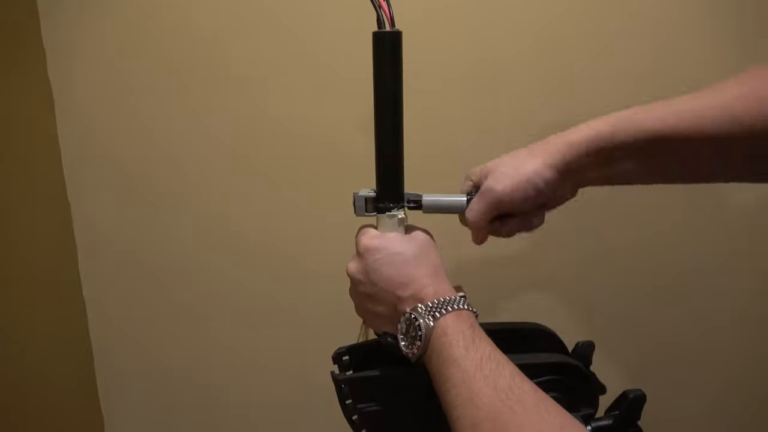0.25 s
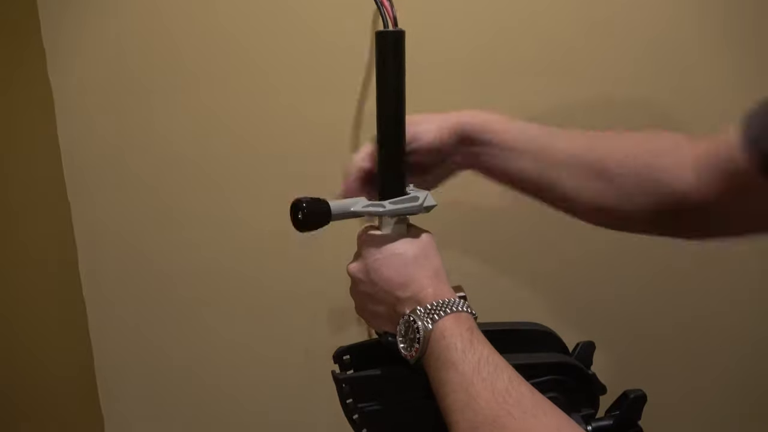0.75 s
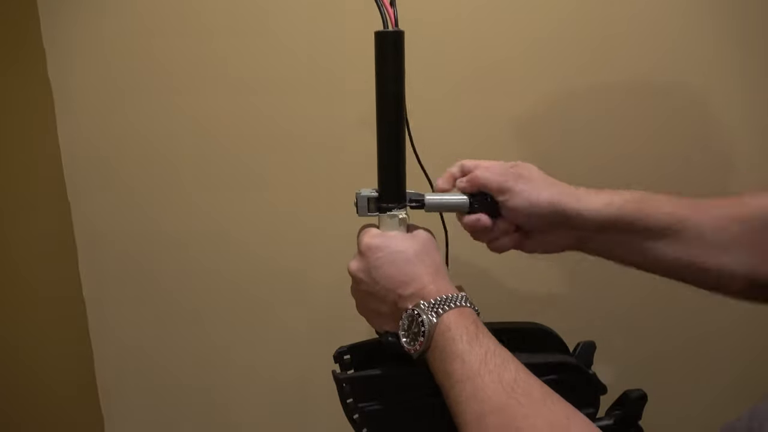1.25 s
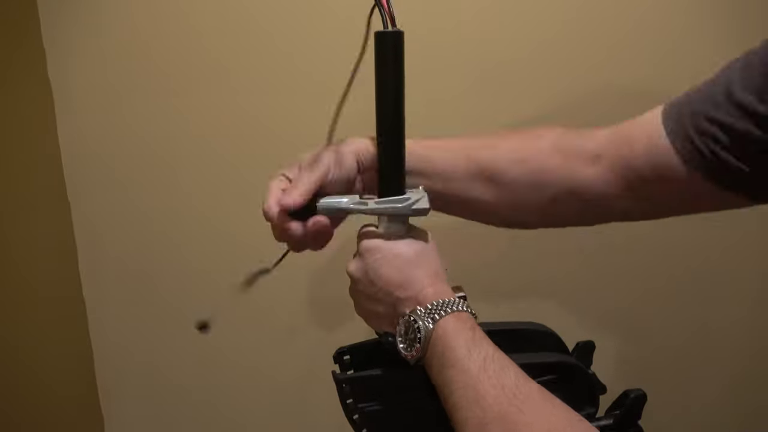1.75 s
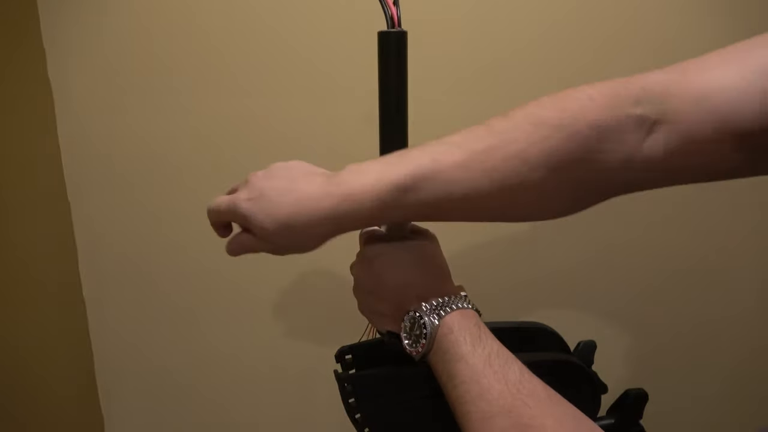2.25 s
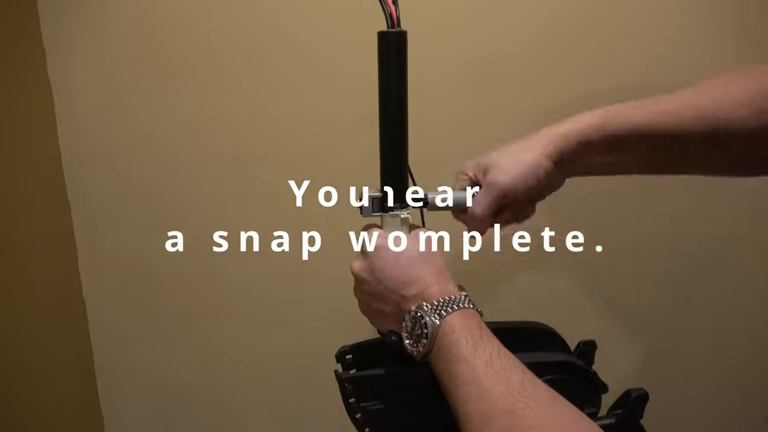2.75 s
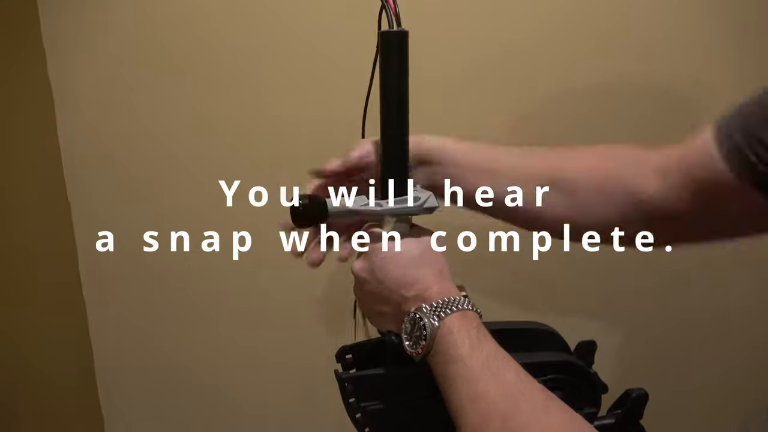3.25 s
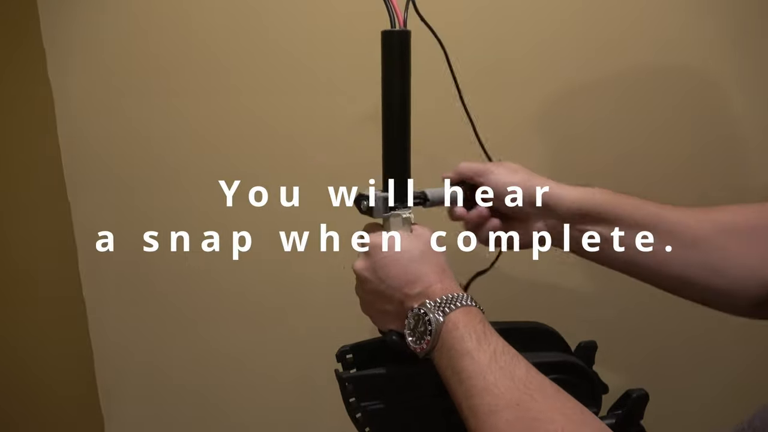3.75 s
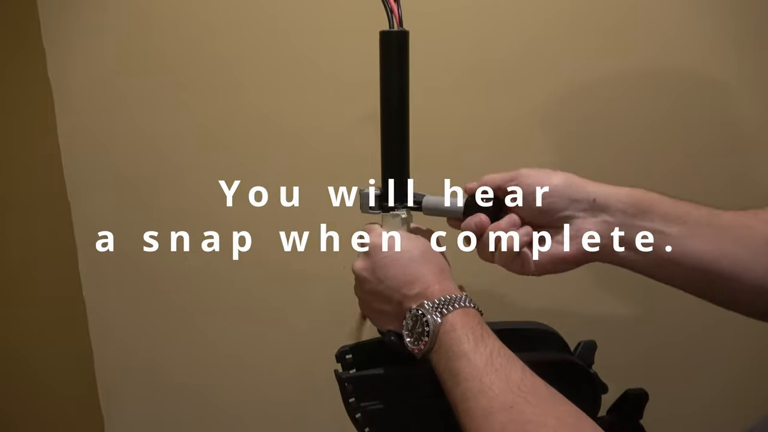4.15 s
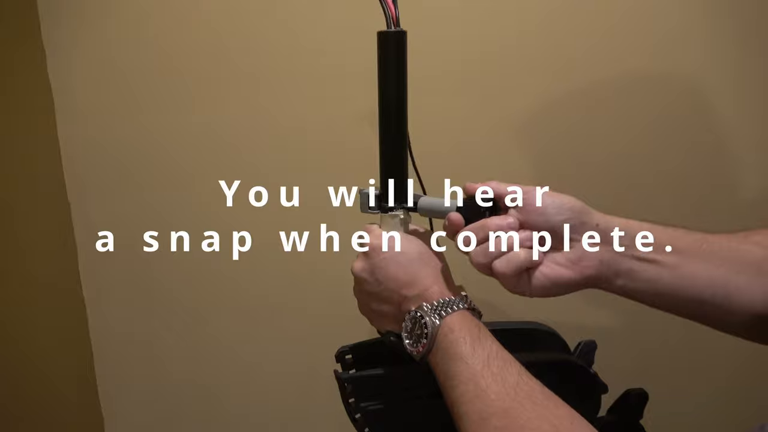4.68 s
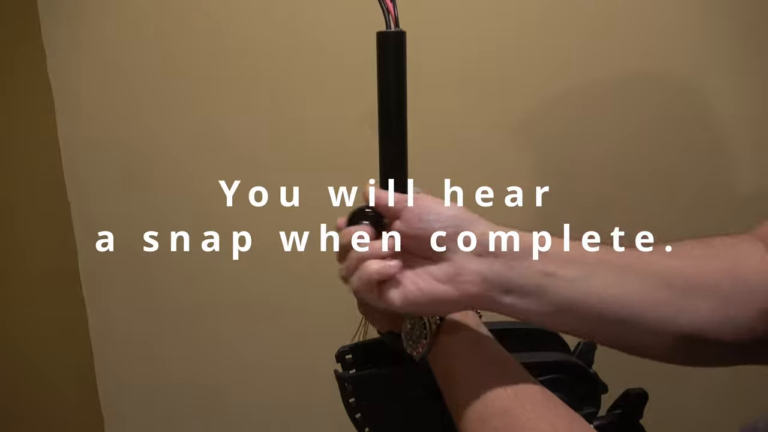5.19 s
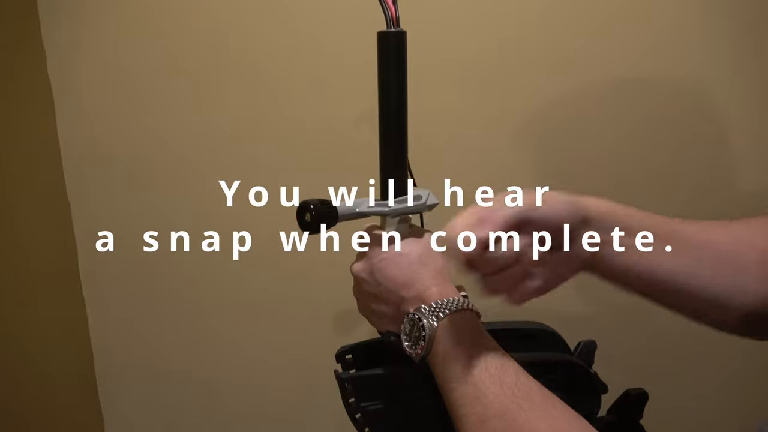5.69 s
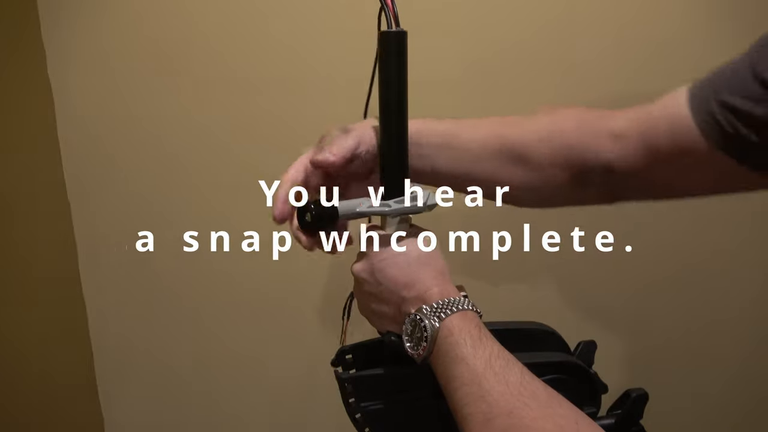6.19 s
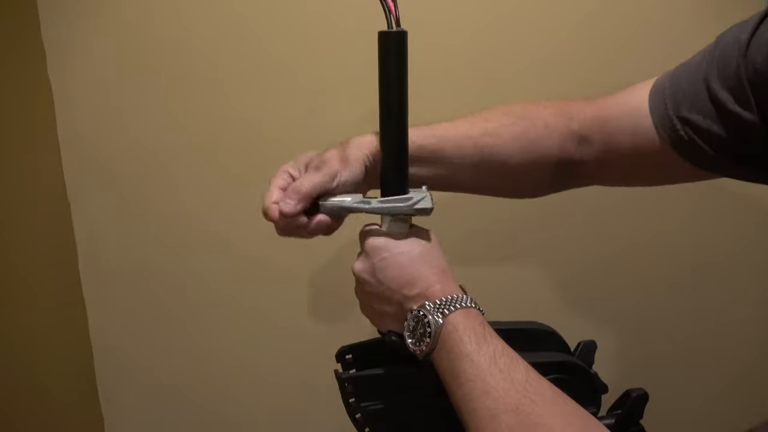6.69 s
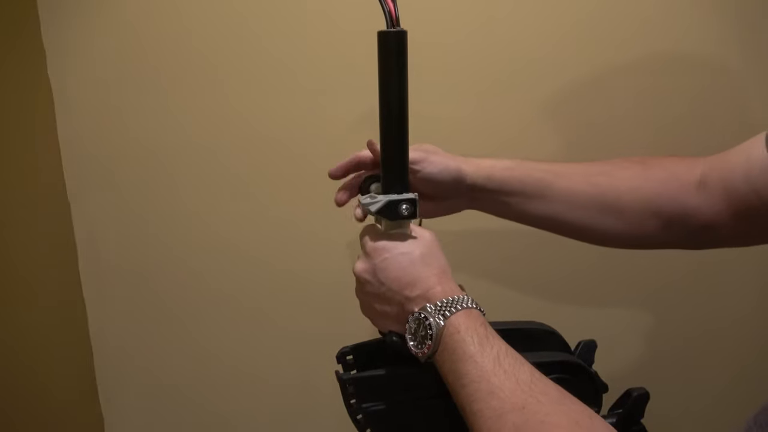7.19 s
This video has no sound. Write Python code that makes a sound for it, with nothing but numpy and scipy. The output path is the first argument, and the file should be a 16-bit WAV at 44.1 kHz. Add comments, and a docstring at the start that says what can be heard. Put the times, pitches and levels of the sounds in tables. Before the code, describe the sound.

Quiet, dry scraping comes in irregular strokes as a pipe cutter circles a metal tube close to the microphone, mixed with quick scuffs and soft thuds of a hand. The scraping turns hissier, the steel frame clicks brightly and the handle knocks. Finally the metal breaks with one loud snap that rings briefly in the small room, followed by a light clink.

```python
"""In a small, hard room, a hand-turned pipe cutter circles a metal tube.
The cutting wheel grinds faintly in uneven strokes while the hand scuffs and bumps the handle.
Later the scraping becomes centred and hissier, the steel frame clicks and the handle knocks.
At last the metal breaks, and the tube parts with a loud, ringing snap."""
import sys
import numpy as np
from scipy import signal
from scipy.fft import rfft, irfft
from scipy.io import wavfile
from scipy.ndimage import uniform_filter1d, map_coordinates

SR = 44100
rng = np.random.default_rng(int(sys.argv[2]) if len(sys.argv) > 2 else 0)


def materialize(psi):
    """Save the field psi as 16-bit PCM at rate SR to the path in sys.argv[1].

    A 1-D psi becomes a single channel; in a 2-D psi each row is a channel.
    """
    bounded = np.clip(np.atleast_2d(psi).T, -1, 1)
    quanta = np.round(bounded * 32767).astype(np.int16)
    wavfile.write(sys.argv[1], SR, quanta)


N = 327652
TIME = np.arange(N) / SR
AGE = TIME[:SR]  # seconds since a blow
# About here the wide, dry scraping becomes centred, hissier and slower to fade, and the rub brightens.
SHIFT_S, SHIFT_LENGTH_S = 3.42, 0.24

# Strokes of the cutter. Each row: start in seconds, length in seconds, grinding in dB, hiss in dB.
STROKES = [(-.01, 0.073, -51, -61), (0.05, 0.22, -60, -65.5), (0.275, 0.047, -55.5, -51.5),
           (0.452, 0.215, -58.5, -62), (0.718, 0.022, -62, -65.5), (0.929, 0.076, -55, -60),
           (1.021, 0.25, -54, -64), (1.326, 0.04, -54, -60), (1.45, 0.22, -52, -58.5),
           (1.722, 0.078, -60, -70), (1.849, .19, -49, -59), (2.067, 0.27, -51, -62.5),
           (2.333, 0.11, -67, -61.5), (2.504, 0.18, -51.5, -55), (2.853, 0.11, -56, -69),
           (2.976, 0.19, -55.5, -59.5), (3.206, 0.037, -57.5, -57.5), (3.263, 0.017, -52, -51.5),
           (3.398, 0.021, -47.5, -50), (3.464, 0.019, -46, -40.5), (3.525, 0.76, -52.5, -62),
           (4.162, 0.43, -66, -59.5), (4.315, 0.22, -91, -56), (4.613, 0.31, -66, -63.5),
           (4.898, 0.81, -58.5, -63.5), (5.15, 0.38, -56, -60), (5.33, 0.031, -52, -56),
           (5.525, 0.29, -61, -67), (6.096, 0.024, -90, -46.5), (6.568, 0.34, -61.5, -57),
           (6.626, 0.33, -47.5, -61), (7.063, 0.071, -49.5, -64), (7.195, 0.26, -57, -59.5)]
# The tone of the hand rubbing. Each row: pitch in Hz, level in dB.
RUB_COLOUR = [(80, -35.5), (150, 4.5), (230, 0.5), (350, -1), (520, -12), (1200, -24.5), (16000, -86.5)]
# The handle's modes, the notes it rings at. Each row: pitch in Hz, level in dB.
HANDLE_MODES = [(645, -7), (955, -5), (1084, -25), (1135, 6)]


def undb(db):
    """Turn decibels into a gain to multiply by."""
    return 10 ** (np.asarray(db) / 20)


def fade(t60):
    """A smooth dying away; t60 is the seconds it takes to fall by 60 dB."""
    return np.exp(-np.log(1000) * AGE / max(t60, .002))


def add(track, start_s, sound):
    """Mix a sound into a track at the given time."""
    start = max(int(start_s * SR), 0)
    part = sound[..., :N - start]
    track[..., start:start + part.shape[-1]] += part


def convolve(x, response):
    """Pass a stereo sound through a filter or an echo, keeping its length."""
    return signal.fftconvolve(x, np.atleast_2d(response), axes=-1)[:, :x.shape[-1]]


def colour(x, spectrum, tilt_db=0, tilt_from_hz=20, size=2048):
    """Shape a sound's tone along (Hz, dB) points, adding tilt_db per octave above tilt_from_hz."""
    hz, db = np.transpose(spectrum)
    tilted_db = db + tilt_db * np.log2(np.maximum(hz, tilt_from_hz))
    octave = np.log2(np.maximum(np.fft.rfftfreq(size, 1 / SR), 10))
    cepstrum = irfft(np.log(undb(np.interp(octave, np.log2(hz), tilted_db))))
    # folding onto the first half keeps the filter from sounding before its input
    cepstrum[1:size // 2] *= 2
    cepstrum[size // 2 + 1:] = 0
    taps = irfft(np.exp(rfft(cepstrum)))
    return convolve(x, taps / np.linalg.norm(taps))


def noise(likeness, size=SR):
    """White stereo noise; left and right are unrelated at likeness 0 and the same at 1."""
    mid, side = rng.standard_normal((2, size))
    return np.sqrt((1 + likeness) / 2) * mid + np.sqrt((1 - likeness) / 2) * np.array([side, -side])


def walk(rate, size=N):
    """Random wandering around zero, gliding to a new value rate times a second."""
    steps = rng.standard_normal(size // 8)
    return np.interp(TIME[:size] * rate, np.arange(len(steps)), steps)


def at_peak(x, db):
    """Scale a sound so that its loudest 4 milliseconds reach db."""
    power = uniform_filter1d(np.mean(x ** 2, axis=0), 176)
    return x * undb(db) / np.sqrt(power.max())


def mottle(x, depth_db, width_hz, span_s, size=512):
    """Make narrow bands of pitch swell and fade at random, giving a blotchy, watery texture."""
    hz, seconds, cells = signal.stft(x, SR, nperseg=size)
    place = np.meshgrid(hz / width_hz, seconds / span_s, indexing="ij")
    grid = rng.standard_normal([int(axis.max()) + 2 for axis in place])
    gain = undb(depth_db * map_coordinates(grid, place, order=1, mode="mirror"))
    _, mottled = signal.istft(cells * gain / np.sqrt(np.mean(gain ** 2)), SR, nperseg=size)
    return mottled[:, :x.shape[-1]]


def ring(modes, t60, spread):
    """A struck part's notes, the high ones dying sooner; spread puts left and right out of step."""
    out = 0
    for hz, db in modes:
        phase = 2 * np.pi * (hz * AGE + rng.random())
        out = out + undb(db) * fade(t60 / (1 + hz / 16000)) * np.exp(1j * phase)
    out = np.imag(out * np.exp(1j * spread * np.array([[1], [-1]])))
    return out / np.sqrt(np.sum(out ** 2) / 2)


def diffuse(decays, side_db, build_s):
    """A dense tail of noise that builds up briefly and dies at its own pace in each band of pitch."""
    hz, t60s = np.transpose(decays)
    bin_hz = np.arange(SR // 2 + 1) + 1
    mid, side = rfft(rng.standard_normal((2, SR)))
    # long waves reach left and right more alike than short ones
    side = side * undb(side_db) * np.minimum(bin_hz / 8000, 1) ** .3
    bins = np.array([mid + side, mid - side])
    bands = [np.interp(np.log(bin_hz), np.log(hz), row) for row in np.eye(len(hz))]
    out = sum(irfft(bins * band) * fade(t60) for band, t60 in zip(bands, t60s))
    out = out * (1 - fade(build_s))
    return out / np.sqrt(np.sum(out ** 2) / 2)


def crack(t60, spike):
    """One hard contact: a spike, a few milliseconds of rattling, then a quick dying away."""
    burst = noise(.8) * np.minimum(1.8 * fade(t60), 1)
    burst[:, 0] += spike
    return burst


def resound(burst, response, db):
    """Scale a ringing sound by the strength of the burst that sets it off."""
    return response * undb(db) * np.sqrt(np.sum(burst ** 2) / 2)


def narrow_lows(x, wide_from_hz=7560):
    """Draw lower pitches towards the middle: long waves reach left and right more alike."""
    mid, side = (x[0] + x[1]) / 2, (x[0] - x[1]) / 2
    share = np.clip(np.fft.rfftfreq(len(side), 1 / SR) / wide_from_hz, .25, 1)
    side = irfft(rfft(side) * share, len(side))
    return np.array([mid + side, mid - side])


def room_air():
    """The faint, steady hush of the room."""
    # The tone of the air. Each row: pitch in Hz, level in dB.
    air_colour = [(75, -23), (280, -3), (620, -17), (1300, -12), (2400, 1), (12600, -1), (16000, -7)]
    return undb(-68) * colour(noise(0, size=N), air_colour)


def room_echo():
    """The hard walls throw sound back for about half a second."""
    # How the echo dies. Each row: pitch in Hz, seconds to fall by 60 dB.
    room_t60 = [(600, 0.45), (1400, 0.53), (4500, 0.5), (14000, 0.25)]
    return diffuse(room_t60, side_db=-7, build_s=.02)


def stroke_level(levels_db, rest_db):
    """Level in dB over time: each stroke takes hold, eases as the arm runs out of reach, then dies."""
    attack_s, sag_db_per_s, release_db_per_s = 0.022, 12.5, 409
    power = undb(rest_db) ** 2  # the wheel creeps between strokes
    for (start, length, *_), db in zip(STROKES, levels_db):
        age = np.maximum(TIME[::32] - start, 0)
        slowing = 2.55 if start > 3.5 else 1  # later strokes swell and fade more slowly
        rise = np.minimum(age / (attack_s * slowing), 1)
        fall_db = sag_db_per_s * age + release_db_per_s / slowing * np.maximum(age - length, 0)
        power = power + (rise * undb(db - fall_db)) ** 2
    return np.interp(TIME, TIME[::32], 10 * np.log10(power))


def hand_rub(early, late, grind_db):
    """The hand's low rub swells with each stroke; later it is brighter and more centred."""
    wide = undb(-73) * colour(noise(0, size=N), RUB_COLOUR, tilt_db=2.5)
    centred = undb(-72) * colour(noise(0.91, size=N), RUB_COLOUR, tilt_db=4.0)
    rub = mottle(early * wide + late * centred, depth_db=8.5, width_hz=82.6, span_s=0.035)
    return rub * undb(0.31 * (grind_db - grind_db.mean()))


def burrs(per_second=90):
    """The wheel rides over tiny rough spots, each a soft, short blip of its own pitch and size."""
    out = np.zeros((2, N))
    age = AGE[:SR // 10]
    swell = age ** 2 * fade(0.04)[:len(age)]
    for when, pitch, size, side in rng.random((int(per_second * N / SR), 4)):
        hz = 1150 * 2 ** (1.6 * pitch)
        phase = 2 * np.pi * hz * age + 2 * side * np.array([[1], [-1]])
        add(out, when * N / SR, size * swell * np.sin(phase))
    return out / np.std(out)


def cutting_wheel(early, late, grind_db, hiss_db):
    """The wheel grinds and hisses round the tube through tiny, uneven slips."""
    # The tones of the grinding and of the hiss. Each row: pitch in Hz, level in dB.
    grind_colour = [(200, -44.5), (700, -19), (980, -9), (1500, -2), (2100, -5), (2900, -6), (4500, -13),
                    (16000, -42)]
    hiss_colour = [(1000, -21.5), (3500, -4), (6500, 1), (13000, -4.5), (16000, -13.5)]
    slips = undb(0.7 * walk(600) + 1.7 * walk(45) + 1.2 * walk(14))
    coarse = slips * (early * noise(0, size=N) + late * noise(1.0, size=N))
    coarse = mottle(coarse, depth_db=5.5, width_hz=200, span_s=.04)
    grind = colour(coarse, grind_colour) + undb(-6) * burrs()
    fine = slips * (early * noise(0, size=N) + late * noise(0.79, size=N))
    hiss = colour(mottle(fine, depth_db=1.6, width_hz=300, span_s=.03), hiss_colour)
    hiss_gain = np.hypot(undb(hiss_db + 1), late * undb(-69.5))  # later, more hiss fills the pauses
    return grind * undb(grind_db - 1) + hiss * hiss_gain


def turning():
    """Wheel and hand follow the same strokes, sounding wide at first and centred later."""
    _, _, grinds, hisses = np.transpose(STROKES)
    grind_db = stroke_level(grinds, rest_db=-86)
    hiss_db = stroke_level(hisses, rest_db=-75)
    shift = np.pi / 2 * np.clip((TIME - SHIFT_S) / SHIFT_LENGTH_S, 0, 1)
    early, late = np.cos(shift), np.sin(shift)
    return cutting_wheel(early, late, grind_db, hiss_db) + hand_rub(early, late, grind_db)


def hand_bumps():
    """The soft hand bumps the cutter and tube, waking their low notes with a thud."""
    # Each row: start in seconds, level in dB, centre pitch in Hz, drop away from it in dB per octave.
    bumps = [(0.537, -50, 137, 10), (1.514, -37, 216, 15), (2.174, -26.5, 510, -1), (2.207, -32, 154, 18),
             (2.238, -32, 162, 3), (5.072, -53, 430, 8), (5.265, -44.5, 310, 40)]
    # The notes of the cutter and tube held together. Each row: pitch in Hz, level in dB.
    bump_modes = [(156, 13.5), (215, 7), (320, 2), (517, 14.5), (575, 5.5)]
    out = np.zeros((2, N))
    lowest_hz = bump_modes[0][0]
    for start, db, centre_hz, fall_db in bumps:
        spread = 1.2 if start < SHIFT_S else .3
        notes = 0
        for hz, mode_db in bump_modes:
            gain = undb(mode_db - fall_db * abs(np.log2(hz / centre_hz)))
            notes = notes + gain * ring([(hz, 0)], t60=0.078, spread=spread * (lowest_hz / hz) ** 0.57)
        rub = colour(noise(0) * fade(0.17), RUB_COLOUR)
        thud = (at_peak(notes, 0) + at_peak(rub, -18)) * (1 - fade(0.14))
        add(out, start - .003, at_peak(thud, db - 6.5))
    return out


def hand_scuffs():
    """Each push on the handle is a quick swell of slips: a hollow scrape, grit and a brief ring."""
    # Each row: start in seconds, level in dB, centre pitch in Hz, share of grit in dB,
    # the handle's ring in dB relative to the level, fade time in seconds.
    scuffs = [(0.187, -37.5, 1820, -19, -8.5, 0.13), (0.261, -42, 1350, -13, -10.5, 0.075),
              (1.096, -33.5, 3150, -30, -24, 0.092), (1.152, -24, 2680, -17, -24.5, 0.064),
              (1.197, -35, 1600, -4.5, -9, 0.067), (1.225, -32, 2820, -41, -28, 0.084),
              (1.415, -38, 2030, -30, -2.5, 0.077), (1.738, -34, 2340, -20, -25, 0.093),
              (1.907, -20.5, 2420, -23, -22, 0.091), (1.94, -34, 1850, -26, -23, 0.075),
              (2.173, -23.5, 2280, -5, -17.5, 0.14), (2.205, -33, 2540, -9, -9, 0.12),
              (2.239, -36, 2070, -10.5, -5, 0.13), (2.313, -36, 1520, -17, -10.5, 0.083),
              (2.569, -21, 2070, -28, -19, 0.12), (2.794, -39, 1630, -4.5, -26, 0.15),
              (2.838, -35.5, 1610, -2, -27, 0.07), (6.675, -55, 2850, -28, -20, 0.43)]
    # The tone of the grit. Each row: pitch in Hz, level in dB.
    grit_colour = [(600, -45), (3000, -6), (6500, 3), (11000, -5.5), (16000, -28)]
    # The hollow tone. Each row: octaves from the centre pitch, level in dB.
    hump = [(-1.5, -36), (-1, -9.9), (-.5, -2.7), (0, 0), (.5, -4), (1, -16), (2, -40), (15, -60)]
    out = np.zeros((2, N))
    size = SR // 5
    for start, db, centre_hz, grit_db, ring_db, t60 in scuffs:
        rise_s = .15 * t60
        rise = np.minimum(AGE / rise_s, 1) ** 2
        fall = np.minimum(fade(t60) * undb(60 * rise_s / t60), 1)  # begins once the rise is over
        slips = (rise * fall * undb(2 * walk(669, size=SR)))[:size]
        body_colour = [(centre_hz * 2 ** octaves, level) for octaves, level in hump]
        body = colour(noise(0, size) * slips, body_colour)
        body = mottle(body, depth_db=4.5, width_hz=120, span_s=.08)
        grit = colour(noise(0, size) * slips, grit_colour)
        share = undb(grit_db)
        scrape = np.sqrt(1 - share ** 2) * body + share * grit
        handle = convolve(noise(0, size) * slips, ring(HANDLE_MODES, t60=0.06, spread=0))
        add(out, start - rise_s / 2, at_peak(scrape, db - 4.5) + at_peak(handle, db + ring_db))
    return out


def handle_knocks(room):
    """The handle takes up its slack with a dull knock that leaves it ringing."""
    # Each row: start in seconds, level in dB, tilt towards treble in dB per octave, ring in dB.
    knocks = [(3.617, -32.5, 7.5, -35), (5.057, -49, -4, -10.5), (5.576, -33.5, 0, -8),
              (5.646, -49.5, 2.5, -11), (6.225, -35, -1, -10.5)]
    # The tone of a knock. Each row: pitch in Hz, level in dB.
    knock_colour = [(80, -53), (420, -28), (640, -2), (800, -16.5), (1110, 11), (1300, -5.5), (1650, 5),
                    (2400, -3.5), (3800, -16.5), (6000, -30.5), (16000, -75)]
    out = np.zeros((2, N))
    for start, db, tilt_db, ring_db in knocks:
        contact = noise(0.41) * fade(0.11) * (1 - fade(0.023))
        burst = at_peak(colour(contact, knock_colour, tilt_db), db)
        handle = resound(burst, ring(HANDLE_MODES, t60=0.34, spread=.15), ring_db)
        add(out, start - .001, burst + handle + undb(-7.5) * convolve(burst, room))
    return out


def frame_clicks(room, treble_hz=4500):
    """Steel parts jump against each other: a bright crack, the frame's ring and the room's echo."""
    # Each row: start in seconds, level in dB, tilt of the treble in dB per octave, ring in dB.
    clicks = [(3.491, -34, 2.5, -8), (3.507, -36.5, -13, -17), (3.646, -29, -3, -4), (3.657, -28.5, 4, -3),
              (3.6662, -20.5, -2.5, -25), (3.722, -23, 0, -30), (3.87, -25, 0.5, -4.5),
              (3.902, -13.5, 2, -25), (3.908, -20, 2, -25), (3.943, -19, -2, -18), (3.949, -14, 1.5, -4.5),
              (4.782, -46, 2, -18), (4.828, -23.5, -0.5, -14), (5.152, -42, 2.5, -15),
              (5.216, -46.5, -3, -18), (5.256, -37, 1.5, -12), (5.375, -37.5, -2.5, -21),
              (5.39, -36, 0.5, -30), (6.733, -43, -3, -18), (7.3289, -30.5, -7, -3),
              (7.336, -35.5, -11.5, -2)]
    # The tone of a click and the notes of the frame. Each row: pitch in Hz, level in dB.
    click_colour = [(60, -51), (150, -13), (500, -27.5), (800, -12), (1000, 0.5), (1450, 2), (2800, -2.5),
                    (4200, -1), (5000, -1), (9000, 3), (10800, -4), (13200, 0.5), (16000, -9.5)]
    frame_modes = [(965, -4), (1474, -1), (4031, 1), (4090, 3), (4160, 3), (4228, 2), (4400, -1),
                   (4893, -4), (7781, -3), (7991, -4)]
    out = np.zeros((2, N))
    for start, db, tilt_db, ring_db in clicks:
        contact = crack(t60=.035, spike=5.5)
        burst = at_peak(colour(contact, click_colour, tilt_db, tilt_from_hz=treble_hz), db - 2)
        # every contact wakes the notes in its own mix; a duller one wakes the highest less
        modes = [(hz, mode_db + 2 * rng.standard_normal() + tilt_db * np.log2(max(hz / treble_hz, 1)))
                 for hz, mode_db in frame_modes]
        # the loose joints rattle, which blurs the ring and drains its first strength quickly
        rattle = np.exp(.4 * walk(170, size=SR)) * (1 + 1.5 * fade(.16))
        frame = resound(burst, ring(modes, t60=0.68, spread=0.083) * rattle, ring_db - 6)
        # hard blows also shake one low, short note from the handle
        handle = resound(burst, ring([(674, 0)], t60=0.25, spread=1.0), -12.5 + .5 * db)
        add(out, start, burst + frame + handle + undb(-3.5) * convolve(burst, room))
    return out


def tube_snap():
    """The last thread of metal breaks; the freed tube rings with clear notes and a dense wash of them."""
    # A small crack, then the tube parts. Each row: start in seconds, level in dB.
    breaks = [(6.76, -35), (6.767, -11)]
    # The snap's tone, the tube's clear notes, and the groups its other notes crowd into.
    # Each row: pitch in Hz, level in dB.
    snap_colour = [(60, -63), (150, -12), (440, -17), (520, -6), (950, -1.5), (1400, 1.5), (2800, 0),
                   (3800, -2), (7500, 2.5), (9000, -1.5), (9800, -7.5), (13000, -3), (16000, -17)]
    tube_modes = [(1475, -4), (3764, -2), (3841, 0), (4888, -2), (5297, 2), (5386, 1), (6443, -2),
                  (6647, -1), (7332, 0), (7581, -1), (11668, -5), (12692, -2)]
    tube_groups = [(3300, -2), (3850, 3), (4700, -2), (5330, 4.5), (5800, -3), (7400, 0)]
    # How the wash dies. Each row: pitch in Hz, seconds to fall by 60 dB.
    wash_t60 = [(150, 0.77), (550, 0.44), (1400, 0.62), (4500, 0.56), (8000, 0.43), (14000, 0.29)]
    # the loosened ends chatter on for a moment, holding up the wash before it dies away
    chatter = undb(-7 * np.maximum(1 - AGE / 0.1, 0))
    out = np.zeros((2, N))
    for start, db in breaks:
        burst = at_peak(colour(crack(t60=0.041, spike=2.7), snap_colour, tilt_db=3.0), db - 4)
        wash = colour(diffuse(wash_t60, side_db=-6, build_s=.01), tube_groups)
        wash = mottle(wash, depth_db=4, width_hz=45, span_s=.4, size=1024)
        wash = colour(wash * chatter, snap_colour)
        notes = ring(tube_modes, t60=0.47, spread=0.1)
        add(out, start, burst + resound(burst, wash, db=8.24) + resound(burst, notes, db=-4))
    return out


def scene():
    """Cutter, hand and tube over the faint air of the room."""
    room = room_echo()
    handling = hand_scuffs() + hand_bumps()
    blows = narrow_lows(frame_clicks(room) + handle_knocks(room) + tube_snap())
    return room_air() + turning() + handling + undb(-21.5) * convolve(handling, room) + blows


def record(dry, top_hz=16000):
    """Cut away the very highest treble."""
    return signal.sosfilt(signal.ellip(10, .2, 80, top_hz, fs=SR, output="sos"), dry)


dry = scene()
out = record(dry)
materialize(out)
```